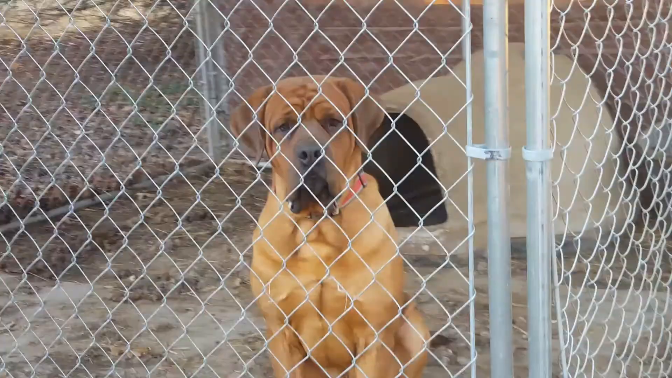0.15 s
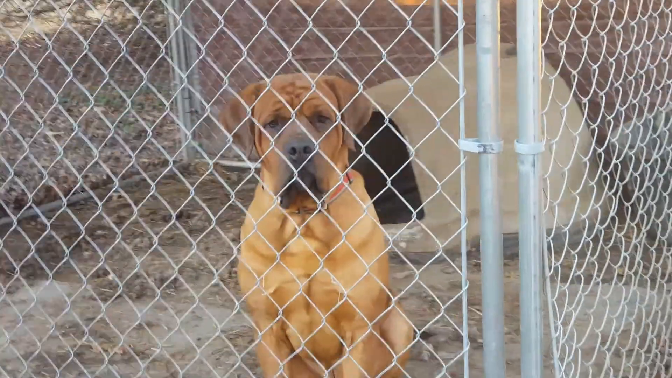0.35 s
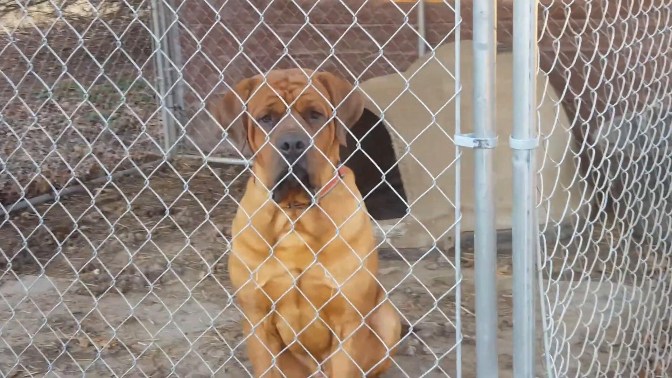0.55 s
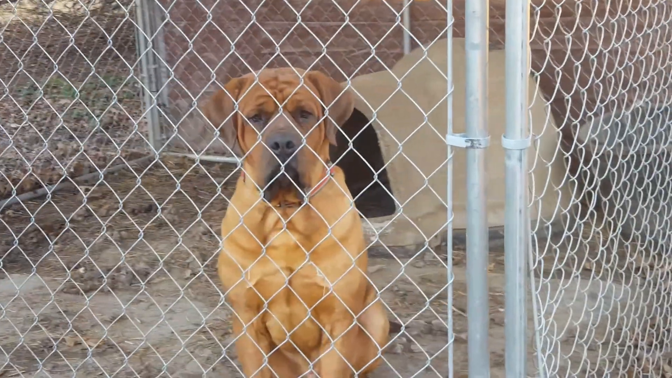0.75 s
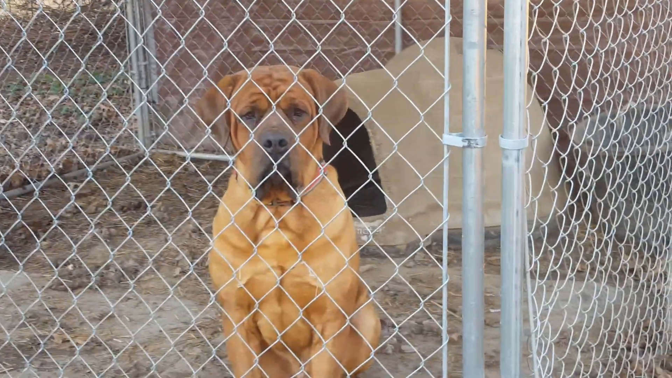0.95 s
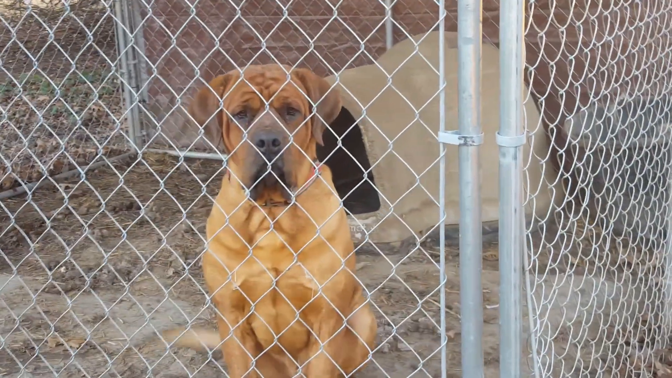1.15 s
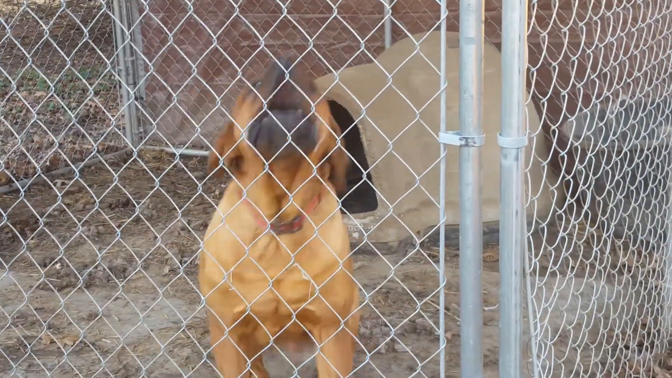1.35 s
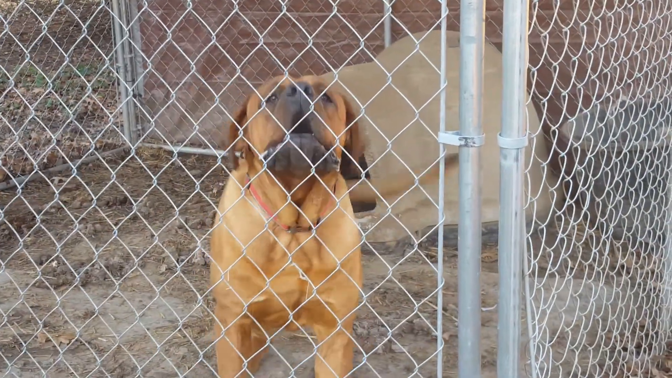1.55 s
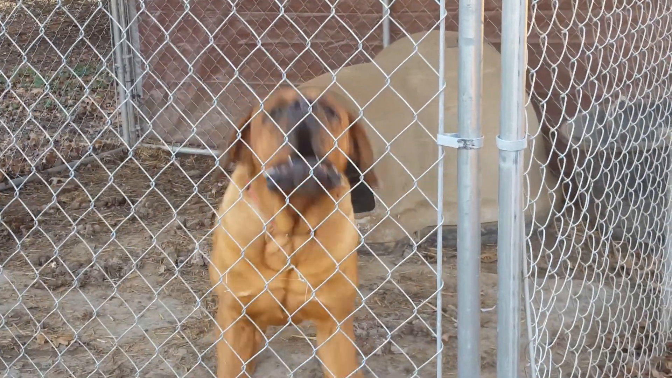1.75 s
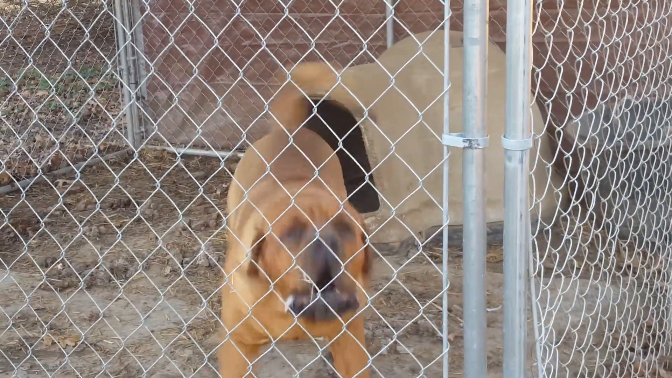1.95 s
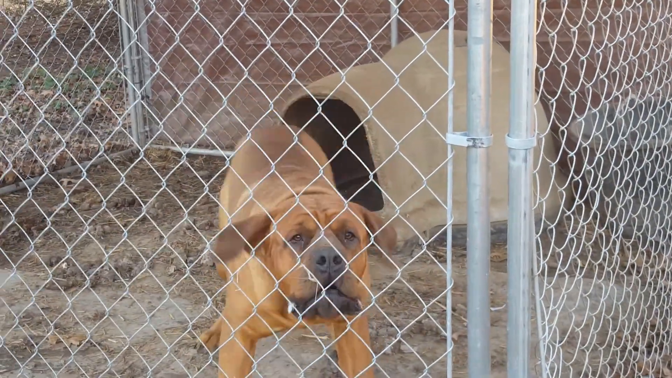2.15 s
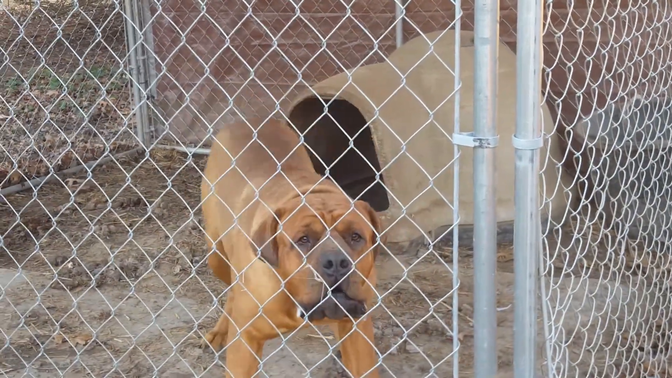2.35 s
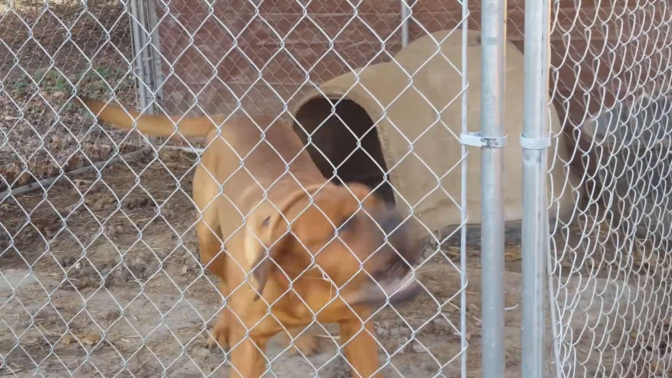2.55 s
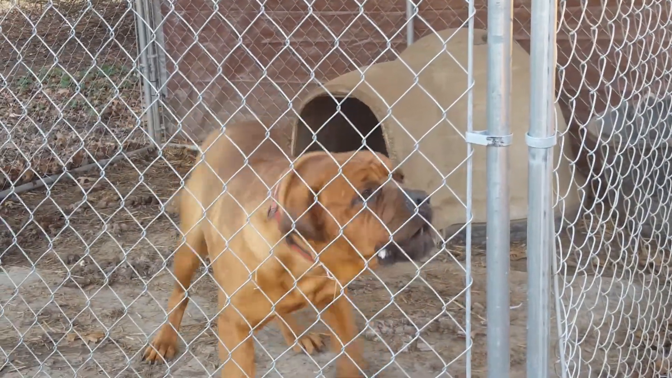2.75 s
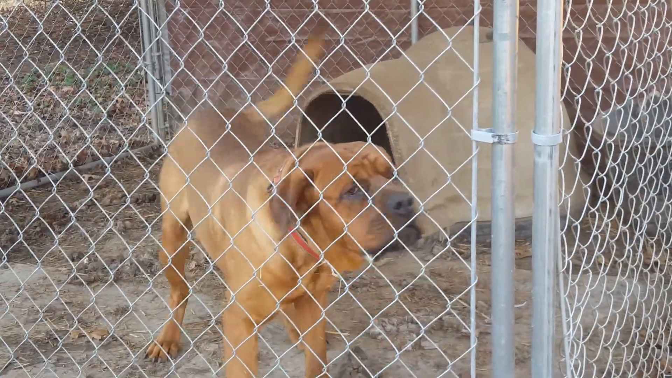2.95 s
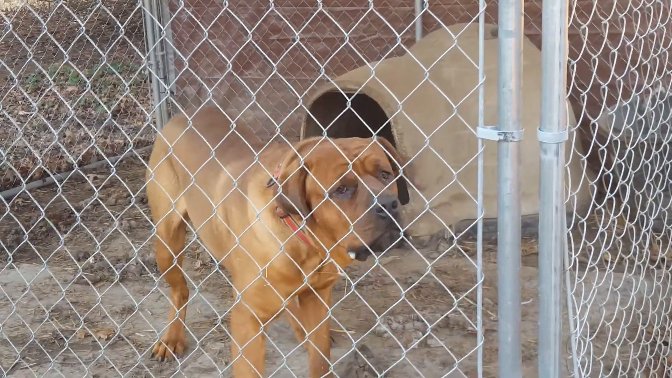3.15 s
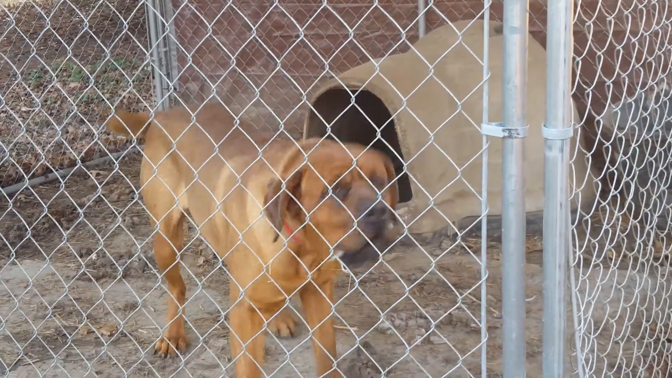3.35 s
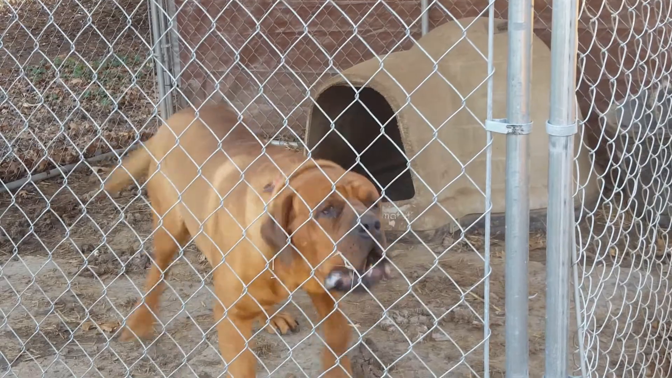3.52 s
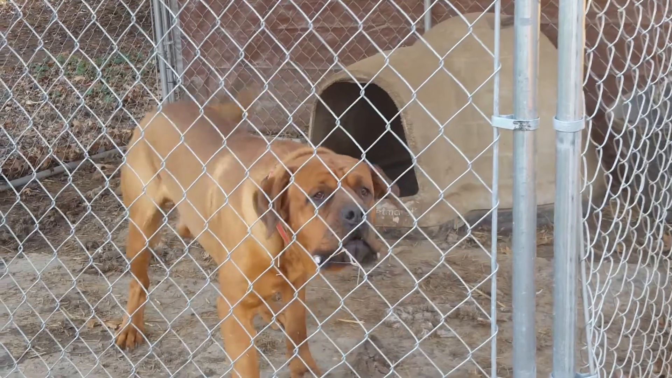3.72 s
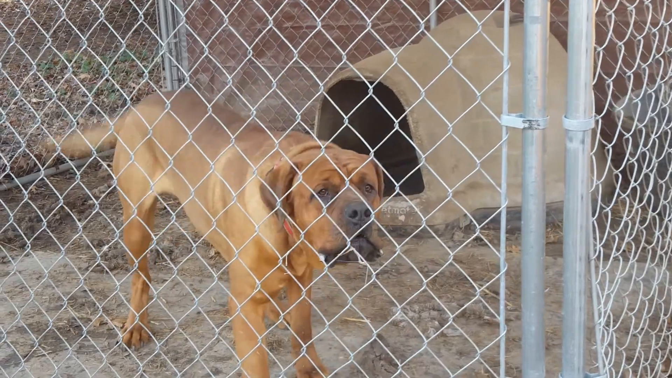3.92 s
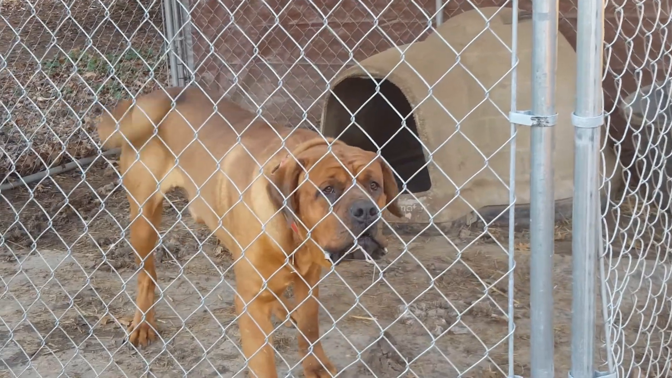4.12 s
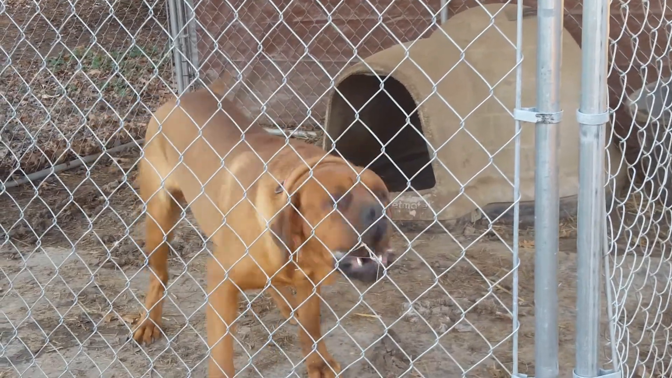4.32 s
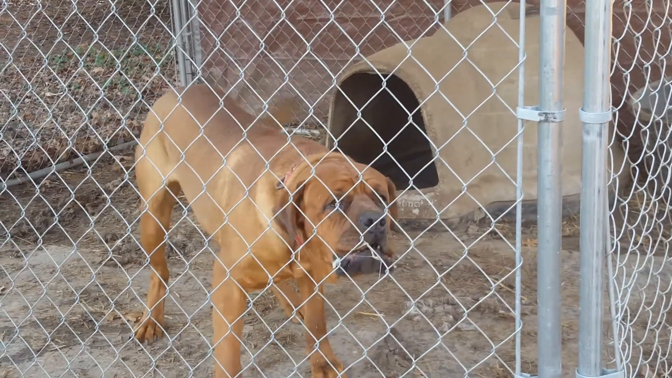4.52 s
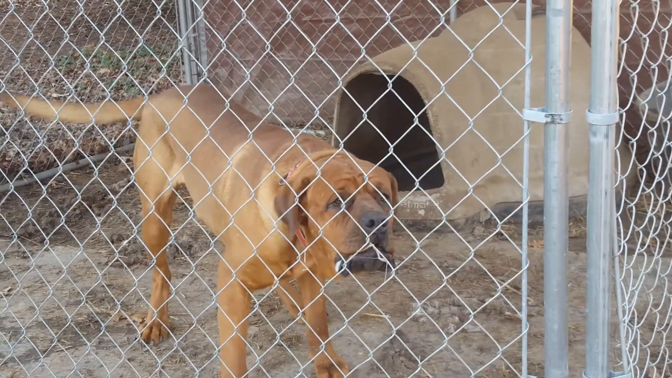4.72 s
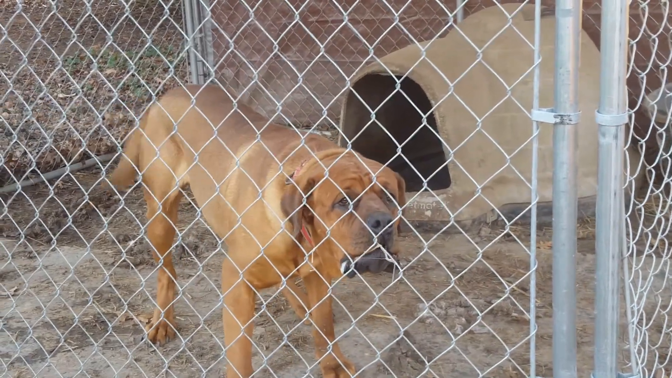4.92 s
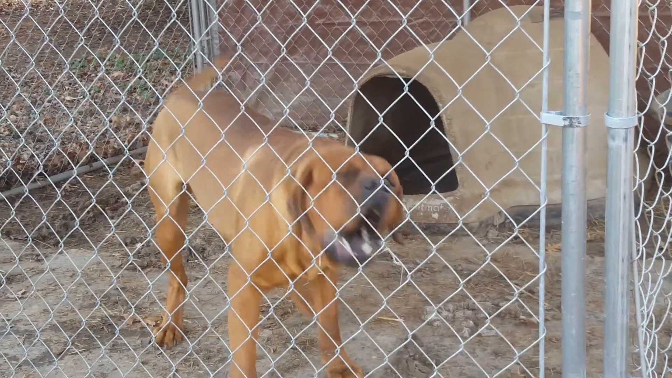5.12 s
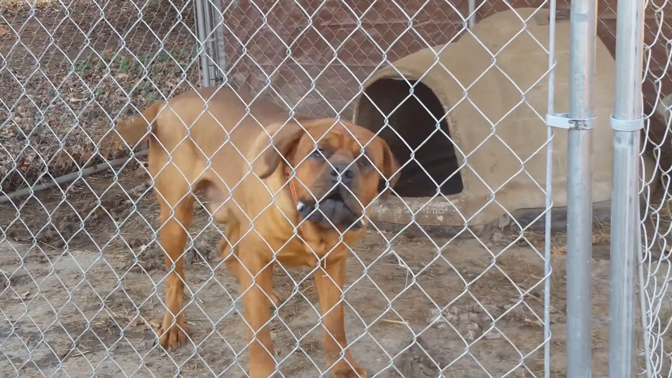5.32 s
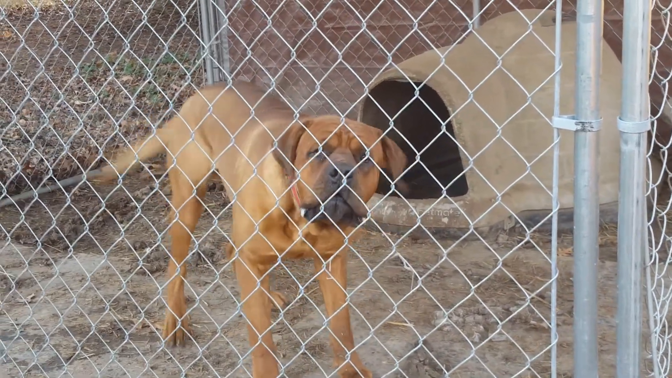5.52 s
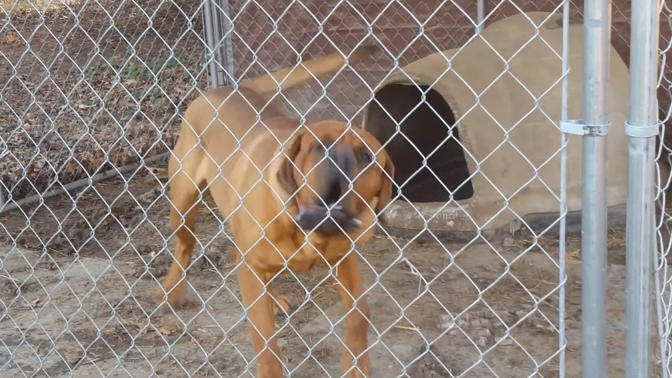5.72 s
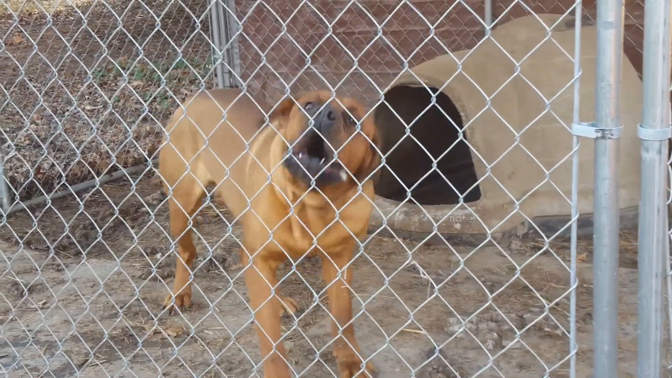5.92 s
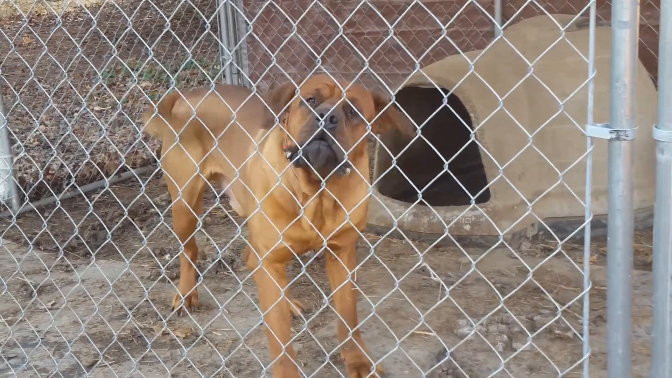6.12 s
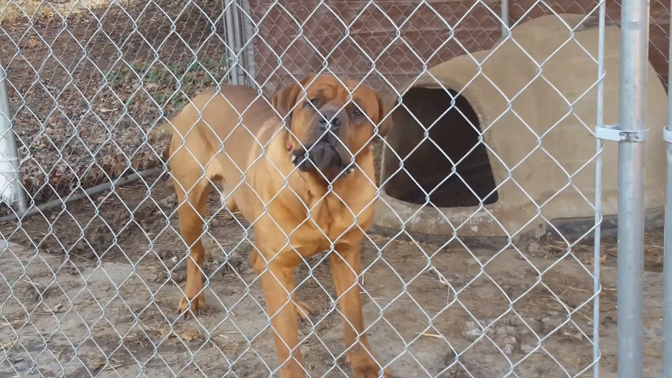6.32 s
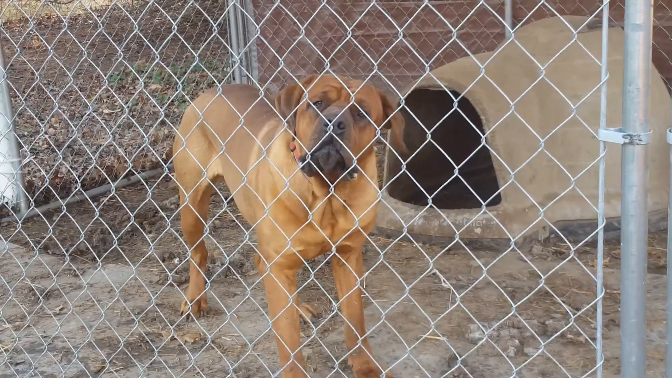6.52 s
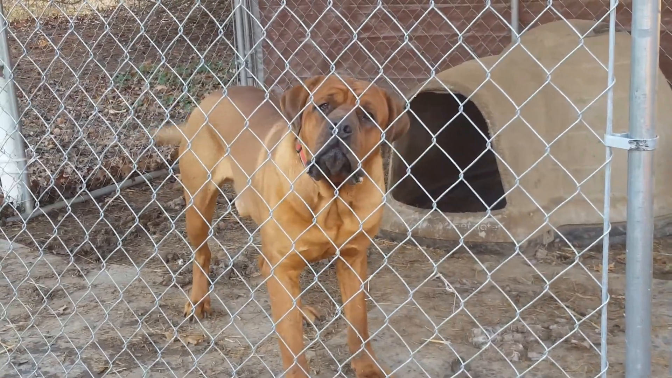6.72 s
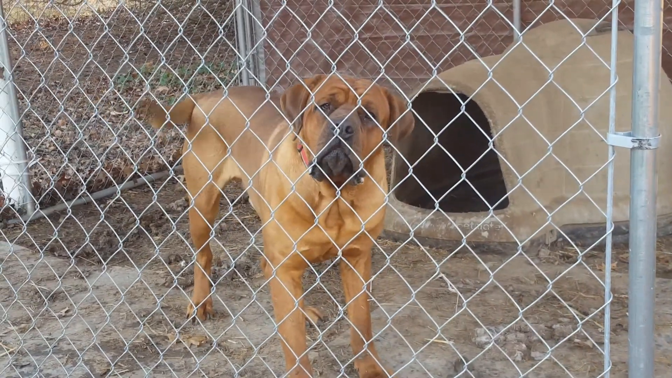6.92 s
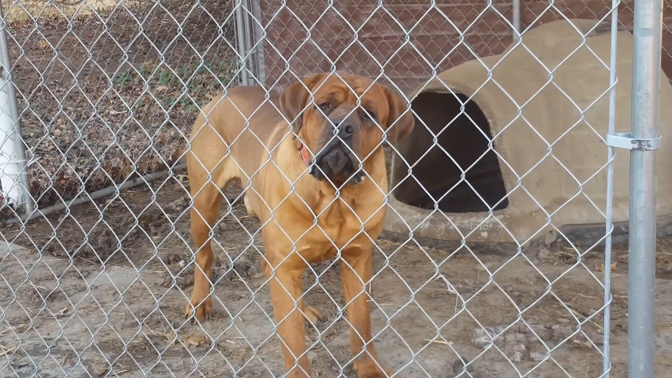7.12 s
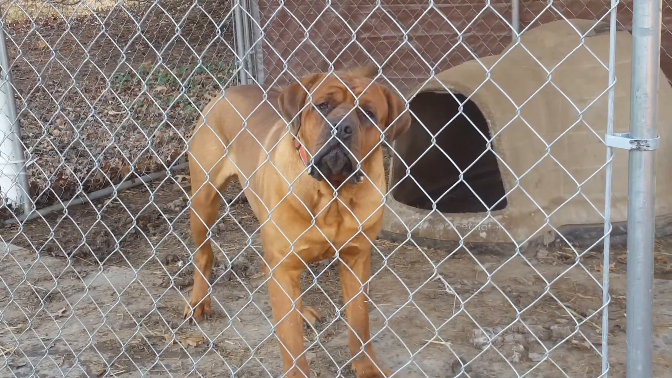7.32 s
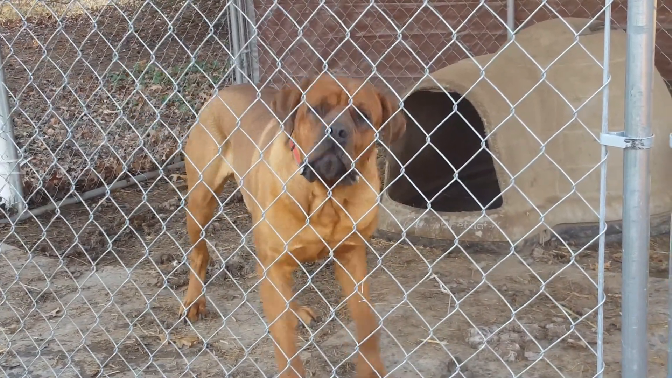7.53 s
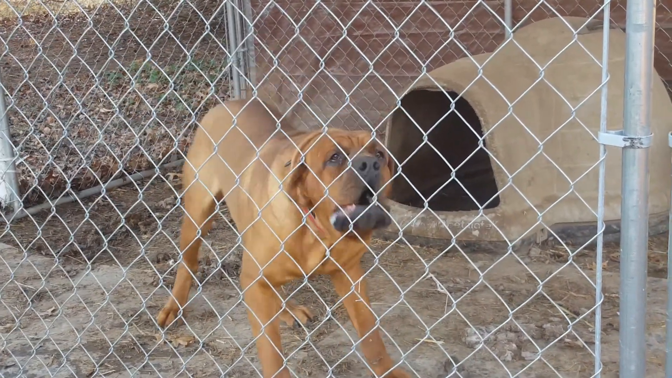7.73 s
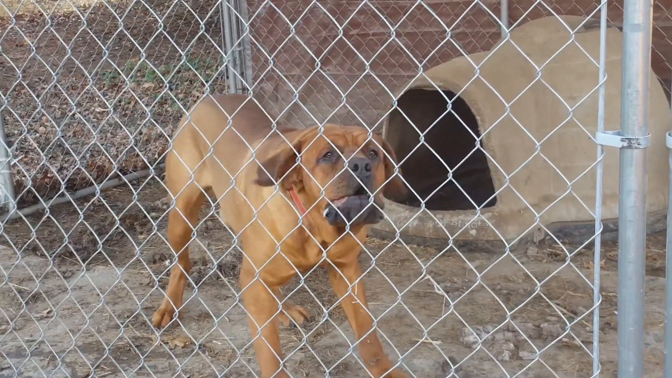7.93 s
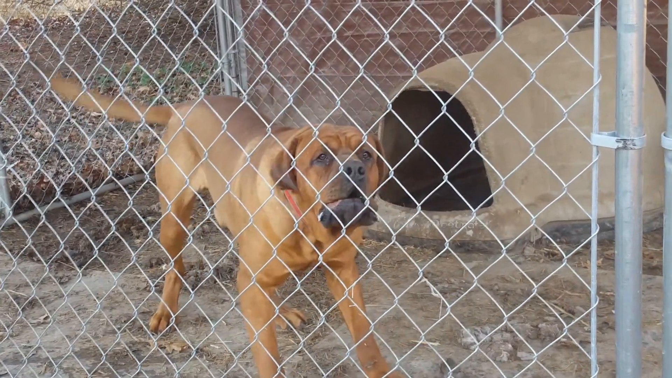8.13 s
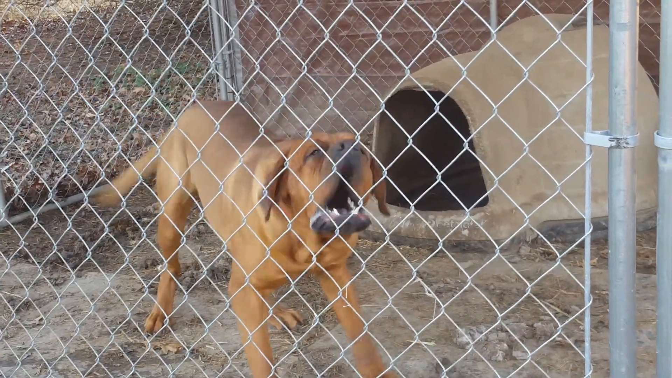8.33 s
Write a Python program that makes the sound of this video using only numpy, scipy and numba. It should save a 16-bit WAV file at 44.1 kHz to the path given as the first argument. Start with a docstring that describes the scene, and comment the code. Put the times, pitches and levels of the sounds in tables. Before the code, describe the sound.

Outdoors at a wire kennel run, footsteps crunch and snap over dry grit and twigs for about a second. A small wet click of lips and throat follows, then a large dog barks loudly, close to the stereo microphone: nine short hoarse barks, mostly a little under a second apart, with a longer gap before the last two. Soft shuffles, brief hard slap of echoes, and a faint motor drone underneath.

```python
"""Feet crunch on dry ground in an outdoor run, over the drone of a far motor and a faint hiss.
Lips, throat and chest stir, then a large dog barks nine times; soft shuffles go on between the barks.
Each bark is a source and filter: unsteady fold pulses and turbulence ring the throat and mouth resonances.
Mesh, ground, walls and far yards echo it; the low background is quieter through most of the barking.
Rustle and crackle are shaped noise; snaps of grit and twigs are short damped oscillations."""
import sys
import numpy as np
from scipy import signal
from scipy.fft import rfft, irfft
from scipy.io import wavfile
from scipy.ndimage import uniform_filter1d, minimum_filter1d
from numba import njit

SR = 44100
rng = np.random.default_rng(int(sys.argv[2]) if len(sys.argv) > 2 else 0)


def log_audio(samples):
    """Write samples as a 16-bit WAV file to the path given in sys.argv[1]."""
    # one column per channel
    frames = np.atleast_2d(samples).T
    # limit to full scale, then quantise
    limited = np.clip(frames, -1, 1)
    pcm = np.round(limited * 32767).astype(np.int16)
    wavfile.write(sys.argv[1], SR, pcm)


N = 373527

# left-right likeness of diffuse background sound: frequency_hz, likeness (1 = identical)
DIFFUSE_LIKENESS = [(60, 0.87), (180, 0.93), (550, 0.26), (1650, 0.26), (4970, 0.22), (15000, -0.0)]


def amp(db):
    """Definition of the decibel: a level in dB becomes an amplitude ratio."""
    return 10 ** (np.asarray(db) / 20)


def add_db(*levels):
    """Energy summation: unrelated sounds heard together add in power."""
    return 10 * np.log10(sum(amp(db) ** 2 for db in levels))


def rms_one(x):
    """Normalisation by the root mean square, to 1."""
    return x / np.sqrt(np.mean(x ** 2) + 1e-20)


def in_time(rows):
    """Linear interpolation of a table's columns over its times, one value a sample."""
    s, *columns = np.transpose(rows)
    return [np.interp(np.arange(N) / SR, s, column) for column in columns]


def at_hz(points, hz):
    """Interpolation of a spectrum table along a logarithmic frequency axis."""
    table = np.array(points)
    return np.interp(np.log(hz + 1), np.log(table[:, 0] + 1), table[:, 1])


def drift(rate_hz):
    """Random fluctuation: noise through a double one-pole low-pass, rms 1."""
    r = np.exp(-2 * np.pi * rate_hz / SR)
    noise = rng.standard_normal(N + SR)
    return rms_one(signal.lfilter([1], [1, -2 * r, r * r], noise)[SR:])


def coloured(x, spectrum, steep_db=40):
    """Spectral shaping by a table, falling steep_db per octave outside it; rms 1."""
    hz = np.fft.rfftfreq(N, 1 / SR) + 1
    octaves_below = np.maximum(np.log2(spectrum[0][0] / hz), 0)
    octaves_above = np.maximum(np.log2(hz / spectrum[-1][0]), 0)
    gain_db = at_hz(spectrum, hz) - steep_db * (octaves_below + octaves_above)
    return rms_one(irfft(rfft(x) * amp(gain_db), N))


def diffuse(pair, likeness):
    """Interaural coherence: mid and side weights make two unrelated signals alike as the table says."""
    size = pair.shape[1]
    alike = np.clip(at_hz(likeness, np.fft.rfftfreq(size, 1 / SR)), 0, 1)
    mid, side = rfft(pair) * np.sqrt([1 + alike, 1 - alike]) / np.sqrt(2)
    return irfft([mid + side, mid - side], size)


@njit
def resonate(x, angle, r):
    """Damped resonance: a two-pole filter whose centre angle (radians a sample) may move."""
    y = np.zeros(len(x))
    for i in range(2, len(x)):
        y[i] = (1 - r) * (x[i] - x[i - 2]) + 2 * r * np.cos(angle[i]) * y[i - 1] - r * r * y[i - 2]
    return y


def formant(x, hz, width_hz, even_s=.022):
    """Vocal tract resonance: two equal two-pole stages, the level evened over a few cycles."""
    angle = 2 * np.pi * hz / SR
    r = np.exp(-np.pi * width_hz / SR)   # pole radius
    y = resonate(resonate(x, angle, r), angle, r)
    return y / np.sqrt(uniform_filter1d(y ** 2, int(even_s * SR)) + 1e-20)


def bark_controls():
    """Articulation: smoothed courses of pitch, levels, jaw resonance and roughness through the barks."""
    # character of each bark: second_resonance_hz (at its start), upper_resonances_db (over mouth),
    # breath_db (over mouth), roughness (0-1, at full throat), half_pitch_db (at the end, over throat)
    bark_colours = [(695, -3.5, -21.5, .25, -18), (730, -9, -19.5, .5, -22.5), (724, -8.5, -20, .35, -30),
                    (737, -7.5, -18, .6, -27), (730, -7, -18, .45, -25), (766, -5.5, -17.5, .4, -12),
                    (725, -6.5, -22, .25, -27.5), (760, -6.5, -19.5, .4, -23), (753, -7, -19, .4, -38)]
    # course of each bark: time_s, fold_pitch_hz, throat_db, second_resonance_db, open_mouth_db
    bark_courses = [
        [(1.342, 359.7, -22, -22.5, -44), (1.354, 360.4, -17, -16.5, -21), (1.376, 360.5, -8, -14, -20.5),
         (1.412, 361.7, -14.5, -12.5, -21), (1.43, 380.6, -14.5, -15.5, -16.5), (1.464, 384.4, -21, -20, -19),
         (1.48, 377.9, -16.5, -20.5, -23.5), (1.495, 368, -16, -27, -29)],
        [(1.866, 393, -23.5, -20, -37.5), (1.884, 393.4, -14.5, -12.5, -22), (1.894, 384.1, -11, -18, -26),
         (1.916, 384.1, -10.5, -15.5, -16), (1.96, 378.9, -12, -21.5, -17.5), (1.99, 381, -21.5, -25, -17),
         (1.996, 382, -23.5, -24, -22), (2.012, 384, -21.5, -19.5, -19), (2.028, 371, -18, -22.5, -32.5),
         (2.036, 371, -20, -26, -36.5)],
        [(2.565, 435.7, -19, -32.5, -42.5), (2.575, 433.2, -15, -23.5, -27), (2.615, 413.6, -12, -15.5, -19.5),
         (2.637, 418.4, -6, -18, -23), (2.651, 402.6, -12, -24.5, -23), (2.669, 403, -14, -22, -22),
         (2.675, 400.4, -11.5, -20.5, -15.5), (2.687, 401, -13, -19, -22.5), (2.721, 406.2, -17.5, -23, -21.5),
         (2.738, 361, -19.5, -28, -33)],
        [(3.423, 414, -21, -30.5, -53), (3.429, 415, -15, -27.5, -36), (3.443, 436, -17.5, -17.5, -23),
         (3.461, 439, -15, -16.5, -18.5), (3.517, 411.4, -10.5, -26, -19.5), (3.545, 413.8, -22, -25, -20),
         (3.561, 454, -21.5, -20.5, -21), (3.573, 414, -19, -23.5, -28), (3.586, 414, -20, -30.5, -29.5)],
        [(4.279, 415.5, -13, -23.5, -30), (4.303, 418, -14.5, -22, -22), (4.333, 427.6, -8.5, -23, -19),
         (4.353, 425.8, -10, -23, -20), (4.365, 403.3, -15.5, -23, -17.5), (4.375, 401.3, -20, -24, -20.5),
         (4.409, 454, -24, -28, -19.5), (4.419, 469.5, -24.5, -22.5, -25), (4.435, 396, -21.5, -27, -26.5),
         (4.451, 392, -21, -32.5, -34)],
        [(5.086, 412.9, -24.5, -29, -37.5), (5.106, 438.7, -16, -23.5, -24.5), (5.138, 426.4, -15, -21, -18),
         (5.166, 425.9, -9.5, -21.5, -20), (5.188, 400.1, -15.5, -16.5, -18.5), (5.212, 403.4, -21, -24.5, -20),
         (5.262, 405.8, -22, -28, -28.5), (5.28, 457.6, -27, -28, -30.5), (5.31, 455.1, -29.5, -36, -41),
         (5.34, 457.2, -38.5, -50, -55)],
        [(5.803, 426.3, -13, -17.5, -20), (5.809, 425.1, -13.5, -24, -22), (5.839, 424.9, -10, -22.5, -20.5),
         (5.887, 424.9, -5.5, -23, -19.5), (5.895, 424.6, -8, -22, -22), (5.921, 416.7, -12.5, -24, -17),
         (5.947, 414, -18, -21, -25.5), (5.957, 414, -19.5, -20, -19.5)],
        [(7.599, 337.5, -17.5, -24, -35.5), (7.607, 336.8, -11.5, -10, -21), (7.629, 402, -7, -22, -15),
         (7.655, 417.5, -9.5, -30, -16), (7.671, 413, -10, -17, -20.5), (7.687, 386, -11, -16.5, -19),
         (7.695, 382, -14.5, -16.5, -21.5), (7.729, 382, -20, -24.5, -18.5), (7.741, 413, -21, -20, -22),
         (7.759, 388, -19, -26.5, -30)],
        [(8.317, 380.9, -23, -35.5, -47), (8.335, 375.4, -18.5, -24, -25), (8.361, 415.1, -12, -22.5, -19.5),
         (8.375, 421.7, -8, -27, -20.5), (8.419, 413.1, -11, -29, -18.5), (8.435, 364, -16.5, -25.5, -21),
         (8.464, 371, -28.5, -20, -25)],
    ]
    second_rise_hz_per_s = 500   # the 2nd resonance climbs as the jaw moves
    hoarse_per_db = .028   # the folds lose their beat as the throat level drops under its top
    half_grows_db = 41.5   # every other pulse weakens as a bark dies: growth of the half-pitch line

    rows = []
    for course, (second_hz, upper_db, air_db, roughness, half_db) in zip(bark_courses, bark_colours):
        (start, hz, *_), (end, last_hz, *_) = course[0], course[-1]
        silence_before = (start - .005, hz, -70, -75, -80)
        silence_after = (end + .006, .9 * last_hz, -90, -95, -100)
        course = np.array([silence_before, *course, silence_after])
        s, throat, same = course[:, 0], course[:, 2], np.ones(len(course))
        moving_hz = second_hz + second_rise_hz_per_s * (s - start)
        hoarse = np.clip(roughness + hoarse_per_db * (throat.max() - throat), 0, .95)
        half = half_db - half_grows_db * (end - s) / (end - start)
        rows.append(np.c_[course, moving_hz, hoarse, half, upper_db * same, air_db * same])
    return uniform_filter1d(in_time(np.vstack(rows)), SR // 250)   # jaw and throat cannot jump


def barks():
    """Source-filter voice: jittered fold pulses and turbulence, mixed by roughness, ring resonances."""
    # upper mouth resonances: frequency_hz, relative_level_db (per Hz)
    mouth_spectrum = [(850, -36.5), (1450, -1.5), (1640, -3.5), (1900, 6), (2170, -23), (2420, -4.5),
                      (2550, -6), (2700, -30), (3000, -23.5), (3900, -54.5), (6600, -120)]
    # turbulent air at the teeth: frequency_hz, relative_level_db (per Hz)
    breath_spectrum = [(1760, -43), (3000, -3), (3500, -3.5), (4780, -0.5), (5570, -4), (6220, -6.5),
                       (7510, -5.5), (8940, -33.5), (10500, -39.5), (12200, -25), (14400, -34),
                       (15300, -30.5), (15800, -42)]
    third_hz = 1102   # this resonance stays put
    gap_db = -6   # throat noise between the resonances, over the throat level, before roughness
    chest_db = -42.5   # low push of air under each bark; it follows the throat level by half

    (pitch, throat_db, second_db, open_db, second_hz,
     rough, half_db, mouth_db, breath_db) = bark_controls()
    pitch = pitch * (1 + .04 * rough ** 2 * drift(25))   # the beat wanders
    cycles = np.cumsum(pitch * (1 + 0.11 * rough * drift(70))) / SR
    opening = (.5 + .5 * np.cos(2 * np.pi * cycles)) ** 3.3   # short puff once a cycle
    turbulence = rng.standard_normal(N) * (.9 + opening)
    folds = opening * amp(7.0 * rough * drift(80)) + 2.4 * rough ** 2 * turbulence

    voice = amp(throat_db) * formant(folds, pitch, width_hz=120)
    voice -= amp(second_db) * formant(folds, second_hz, width_hz=160)
    voice += amp(open_db) * formant(folds, np.full(N, float(third_hz)), width_hz=383)
    voice += amp(throat_db + gap_db) * rough * formant(turbulence, np.full(N, 530.), width_hz=200)
    mouth = coloured(turbulence + 2.5 * folds, mouth_spectrum)
    voice += amp(open_db + mouth_db + 2.0 * drift(50)) * mouth
    breath = coloured(turbulence, breath_spectrum)
    voice += amp(open_db + breath_db + 1.5 * drift(85)) * breath
    no_bass = signal.butter(6, 310, "high", fs=SR, output="sos")   # the open mouth radiates no bass
    voice = signal.sosfilt(no_bass, voice)

    half_pitch = amp(throat_db + half_db) * np.sin(np.pi * cycles)
    chest = amp(throat_db / 2 + chest_db) * formant(turbulence, np.full(N, 140.), width_hz=480)
    return voice + half_pitch + chest


def knocks(events, cycles, grainy):
    """Damped free oscillation: each knock loses 60 dB in a few cycles, broken up by noise."""
    out = np.zeros((len(events), N))
    t = np.arange(SR // 20) / SR
    grain = 1 + grainy * rng.standard_normal((len(events), len(t)))
    for row, rough, (s, db, hz, *_) in zip(out, grain, events):
        soft = np.minimum(t * hz, 1)   # the first cycle swells
        decay = amp(db - 60 * t * hz / cycles)
        row[round(s * SR):][:len(t)] = soft * decay * np.sin(2 * np.pi * hz * t) * rough
    return out


def grunts():
    """Impulsive excitation of the closed tract: clicks and a thud, low-passed by the shut mouth."""
    # lips and throat click open, the chest thuds: start_s, level_db (before decay), pitch_hz
    grunt_events = [(1.268, -21, 380), (1.293, -26, 410), (1.27, -37, 95)]
    clicks = knocks(grunt_events, cycles=14.0, grainy=1.2).sum(axis=0)
    return signal.sosfilt(signal.butter(4, 1400, fs=SR, output="sos"), clicks)


def ports(x):
    """Direct sound at two ports: level and phase differences between them depend on frequency."""
    # level difference of the ports: frequency_hz, left_over_right_db
    level_offsets = [(60, -0.5), (92, -0.5), (140, 0.0), (210, 0.0), (330, 0.0), (500, -0.5), (770, -1.5),
                     (1170, -3.0), (1790, -1.0), (2740, 6.0), (4190, -0.5), (6410, 1.0), (9810, -0.5),
                     (15000, 0.5)]
    # phase difference of the ports: frequency_hz, left_lead_rad
    phase_leads = [(0, 0), (1210, 0.2), (1980, 1.3), (3620, -0.5), (4570, 1.0), (5430, 0.1), (6200, 2.2),
                   (7670, 1.2), (7920, 1.3), (9300, 6.1), (9820, 6.4), (11200, 6.1), (13500, 6.5),
                   (16000, 6.3)]
    pad = SR // 4
    size = N + pad
    fade = np.minimum(1, np.arange(size)[::-1] / pad)   # only the padding fades
    hz = np.fft.rfftfreq(size, 1 / SR)
    spectrum = rfft(np.pad(x, (0, pad), "reflect") * fade)
    half_lead = .5j * np.interp(hz, *np.transpose(phase_leads))
    offset = amp(at_hz(level_offsets, hz) / 2) * np.exp(half_lead)   # half of it for each port
    return irfft([spectrum * offset, spectrum / offset], size)[:, :N]


def surroundings(x):
    """Reflection and reverberation: convolution with dying dense echoes and smeared single returns."""
    # wire mesh, ground and kennel, far yards high and low:
    # start_s, t60_s, level_db, from_hz, to_hz
    dense_echoes = [(.002, 0.029, -7, 1509, 15050), (.004, 0.43, -35.5, 281.8, 8520),
                    (0.048, 1.6, -48.5, 598.6, 1503), (0.051, 1.5, -66, 301.3, 606.5)]
    # single returns: delay_s, smear_s, level_db, from_hz, to_hz
    wall_returns = [(0.05523, 0.0051, -26, 280, 600), (0.028, 0.032, -32.5, 110, 9600),
                    (0.059, 0.026, -13.5, 2200, 20000), (0.074, 0.03, -39.5, 300, 1900),
                    (0.1, 0.0067, -67.5, 600, 3600)]
    # left-right likeness of the echoes: frequency_hz, likeness (1 = identical)
    echo_likeness = [(60, .9), (180, .9), (350, .93), (550, 0.98), (950, 0.15), (1650, .1), (2860, .35),
                     (4970, .26), (15000, .07)]

    t, response = np.arange(2 * SR) / SR, 0
    shapes = [(amp(-60 * (t - start) / t60) * (t > start), *rest)
              for start, t60, *rest in dense_echoes]
    shapes += [(np.exp(-((t - delay) / smear) ** 2), *rest)
               for delay, smear, *rest in wall_returns]
    for shape, db, low_hz, high_hz in shapes:
        band = signal.butter(2, [low_hz, high_hz], "band", fs=SR, output="sos")
        echo = signal.sosfilt(band, rng.standard_normal((2, len(t))) * shape)
        energy = np.sum(shape ** 2) * 2 * (high_hz - low_hz) / SR   # expected within the band
        response = response + amp(db) * echo / np.sqrt(energy)
    return signal.fftconvolve(x[None], diffuse(response, echo_likeness), axes=1)[:, :N]


def snaps():
    """Impact sound: damped rings of grit and twigs, placed by level difference, dulled by contact."""
    # grit and twigs: start_s, level_db (before decay), pitch_hz, left_over_right_db
    snap_events = [(0.035, -37, 888, -1.5), (0.077, -39, 3500, -2.0), (0.102, -35, 7160, -1.0),
                   (0.116, -31, 1190, 0.0), (0.124, -36, 1150, -1.5), (0.166, -29, 5960, -1.5),
                   (0.267, -36, 5600, -1.0), (0.359, -38, 1320, -0.5), (0.402, -30, 2490, 2.5),
                   (0.478, -30, 3300, 2.0), (0.887, -35, 6750, 1.0), (0.929, -39, 977, 1.0),
                   (1.14, -48, 6500, -2.5), (6.762, -38, 5970, -1.0)]
    pan_db = np.array(snap_events)[:, 3]
    pair = amp([pan_db / 2, -pan_db / 2]) @ knocks(snap_events, cycles=18.0, grainy=1.6)
    return signal.sosfilt(signal.butter(4, 7800, fs=SR, output="sos"), pair)


def ground_levels():
    """Energy summation of steps, shuffles and the yard at rest: rustle and crackle levels in dB."""
    # walking on dry ground: time_s, rustle_db, crackle_db
    feet_course = [(0.0, -59.5, -60.5), (0.118, -53, -57), (0.28, -53, -53), (0.56, -52.5, -51),
                   (0.818, -52, -53.5), (1.0, -57, -60), (1.23, -63.5, -63)]
    # soft shuffles: centre_s, half_width_s (9 dB down), rustle_db, crackle_db
    shuffles = [(0.251, 0.016, -43.5, -58), (.535, 0.017, -52, -59), (1.75, 0.15, -51.5, -67),
                (3.37, 0.05, -63.5, -72), (3.86, 0.09, -79, -75), (4.96, 0.09, -75.5, -84),
                (5.73, 0.067, -58, -77), (6.22, 0.15, -65, -68.5), (7.57, 0.08, -63, -64.5)]
    still_rustle_db, still_crackle_db = -72.5, -80.5   # the yard at rest
    t = np.arange(N) / SR
    feet = in_time([*feet_course, (feet_course[-1][0] + .3, -95, -95)])   # the steps stop
    swells = [np.array(dbs)[:, None] - 9 * ((t - s) / width) ** 2 for s, width, *dbs in shuffles]
    return add_db(feet, *swells, [[still_rustle_db], [still_crackle_db]])


def ground_rustle(level_db):
    """Broadband friction noise: shaped diffuse noise whose level flutters."""
    # rustle: frequency_hz, relative_level_db (per Hz)
    rustle_spectrum = [(150, -28.5), (250, -3), (349, -9), (678, 0), (753, -1.5), (1250, 0), (3000, -16),
                       (3900, -30.5), (6600, -120)]
    noise = coloured(rng.standard_normal((2, N)), rustle_spectrum)
    return amp(level_db + 1.5 * drift(20)) * diffuse(noise, DIFFUSE_LIKENESS)


def ground_crackle(level_db):
    """Random impulse process: sparse strong grains roughen noise when loud; faint hiss stays smooth."""
    # crackle: frequency_hz, relative_level_db (per Hz)
    crackle_spectrum = [(1470, -26), (2500, -7.5), (3560, -12.5), (4100, -14.5), (6820, -3.5), (7480, -8),
                        (9950, -31.5), (12600, -27.5), (14600, -19), (15800, -20.5)]
    graininess = 4.7 * np.clip((level_db + 70.5) / 12, 0, 1)
    struck = rng.random((2, N)) < 600 / SR   # 600 grains a second on average
    grain_gain = amp(3.5 * np.minimum(rng.exponential(1, (2, N)), 3))
    grit = graininess * struck * grain_gain
    noise = coloured(rng.standard_normal((2, N)) * (1 + grit), crackle_spectrum)
    return amp(level_db + 1.7 * drift(25)) * diffuse(noise, DIFFUSE_LIKENESS)


def motor_drone(level_db):
    """Periodic firing in noise: two unsteady sine lines over a low diffuse rumble."""
    # rumble: frequency_hz, relative_level_db (per Hz)
    drone_spectrum = [(12, -43), (20, -18), (27, -12.5), (91, -2), (167, -2.5), (211, -15), (263, -14),
                      (320, -19.5), (420, -47), (700, -120)]
    # firing lines: pitch_hz, line_db (sine peak over rumble rms)
    firing_lines = [(87.5, 1.5), (175, -8)]
    t = np.arange(N) / SR
    rumble = diffuse(coloured(rng.standard_normal((2, N)), drone_spectrum), DIFFUSE_LIKENESS)
    lines = 0
    for hz, db in firing_lines:
        phase = 2 * np.pi * hz * t + .8 * drift(35)
        lines = lines + amp(db + drift(5)) * np.sin(phase)
    return amp(level_db) * (rumble + lines)


def background():
    """Superposition of drone, rustle, crackle and the microphone's own white noise."""
    # course of the low background level: time_s, low_db
    low_level_course = [
        [(0.0, -55), (1.34, -53), (1.51, -61), (2.69, -61.5), (3.18, -67.5), (4.34, -61.5), (4.64, -67),
         (4.98, -73.5), (5.19, -65), (5.59, -73.5), (5.97, -58), (6.23, -73.5), (7.12, -66.5), (7.6, -48),
         (8.14, -67.5), (8.47, -63)],
    ]
    rustle_under_low_db = 7.5   # part of the rustle follows the low background level
    hiss_db = -84.5   # microphone's own noise
    low_db, = in_time(np.vstack(low_level_course))
    rustle_db, crackle_db = ground_levels()
    rustle_db = add_db(rustle_db, low_db - rustle_under_low_db)
    hiss = amp(hiss_db) * rng.standard_normal((2, N))
    return motor_drone(low_db) + ground_rustle(rustle_db) + ground_crackle(crackle_db) + hiss


def scene():
    """Superposition of the dog's direct sound, its echoes, snaps underfoot and the background."""
    dog = barks() + grunts()
    return ports(dog) + surroundings(dog) + snaps() + background()


def record(dry):
    """Peak limiting and band limiting: look-ahead gain holds peaks at a ceiling, then the top is cut."""
    ceiling, cutoff_hz = .95, 16200
    reach = SR // 150
    need = minimum_filter1d(ceiling / np.maximum(np.abs(dry).max(axis=0), ceiling), 2 * reach)
    gain = uniform_filter1d(uniform_filter1d(need, reach), reach)
    top_cut = signal.cheby2(12, 70, cutoff_hz, fs=SR, output="sos")
    return signal.sosfilt(top_cut, gain * dry)


dry = scene()
out = record(dry)
log_audio(out)
```